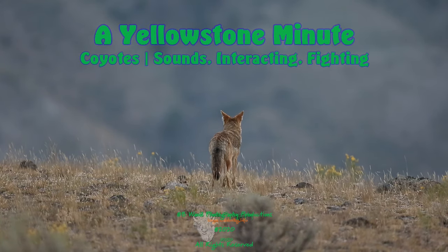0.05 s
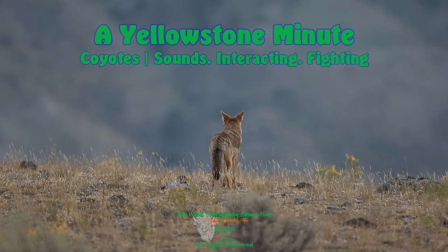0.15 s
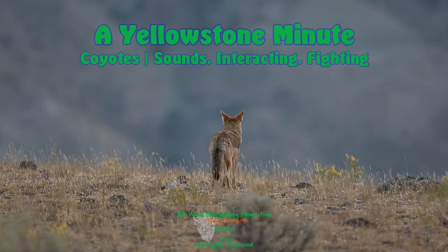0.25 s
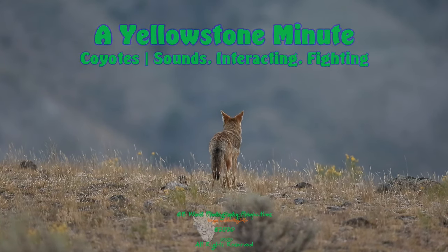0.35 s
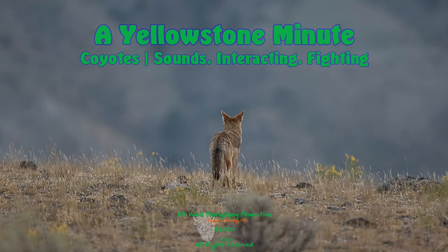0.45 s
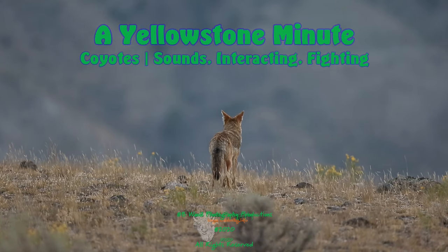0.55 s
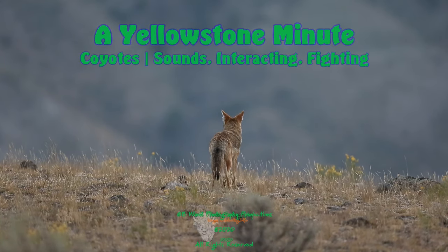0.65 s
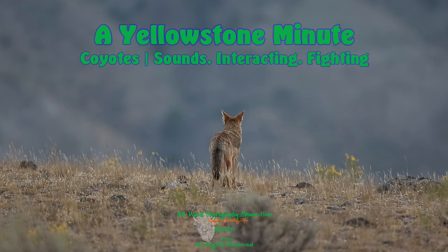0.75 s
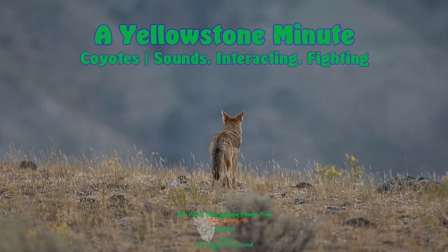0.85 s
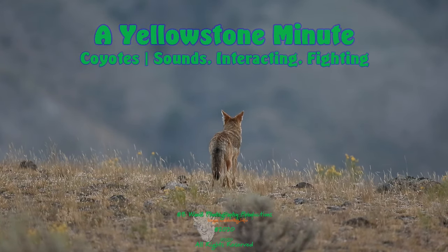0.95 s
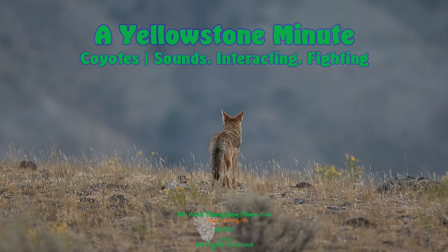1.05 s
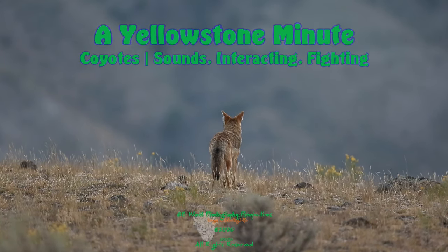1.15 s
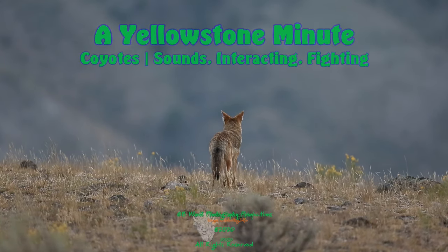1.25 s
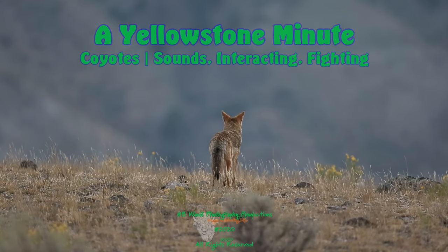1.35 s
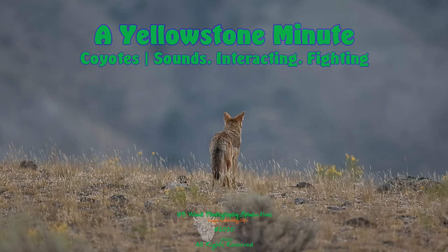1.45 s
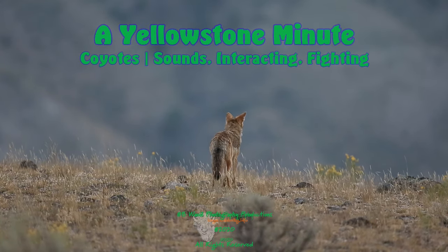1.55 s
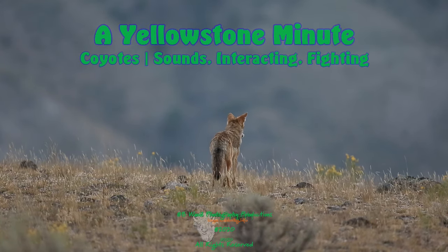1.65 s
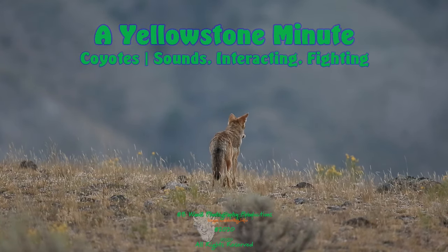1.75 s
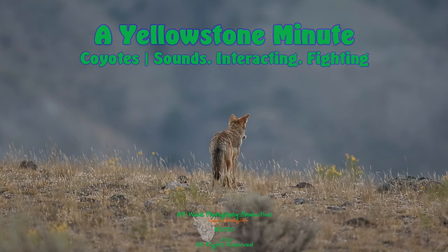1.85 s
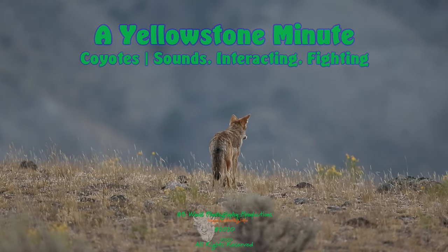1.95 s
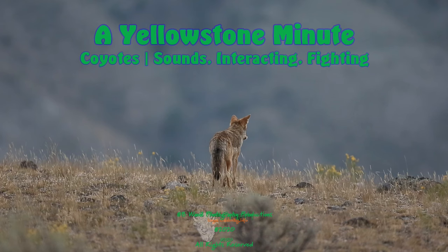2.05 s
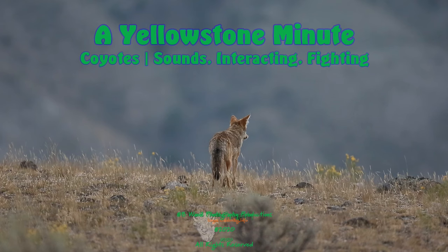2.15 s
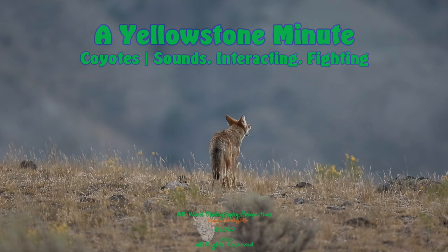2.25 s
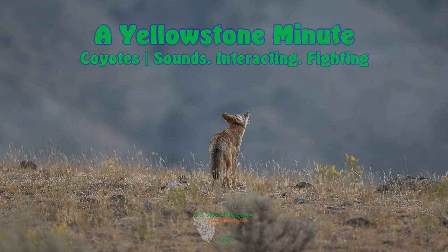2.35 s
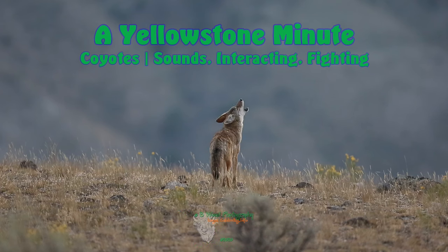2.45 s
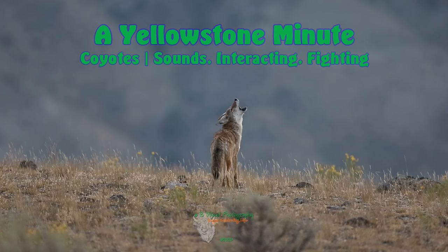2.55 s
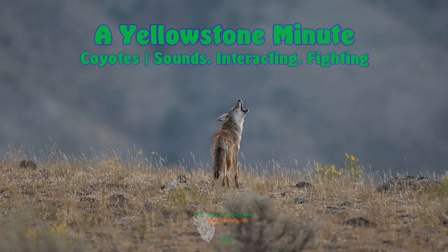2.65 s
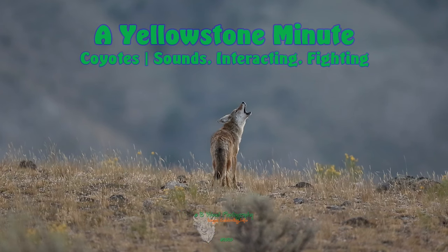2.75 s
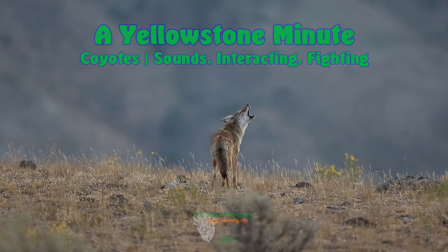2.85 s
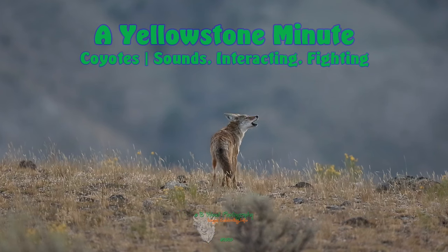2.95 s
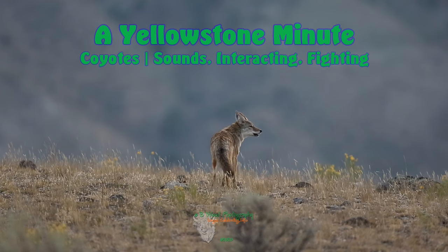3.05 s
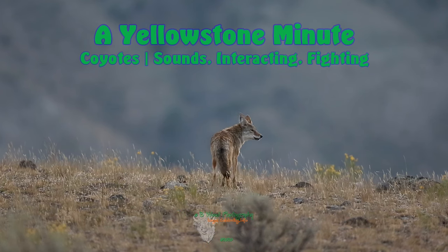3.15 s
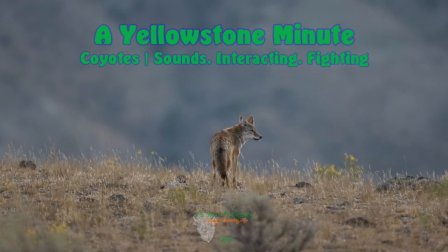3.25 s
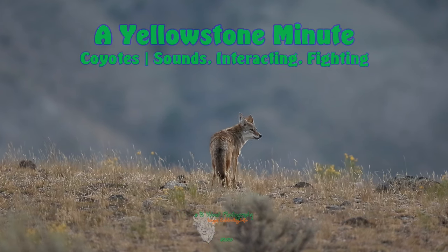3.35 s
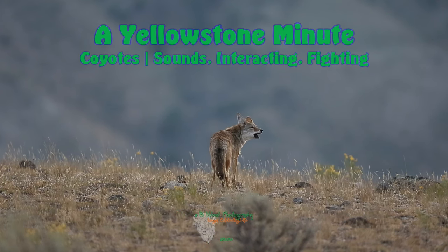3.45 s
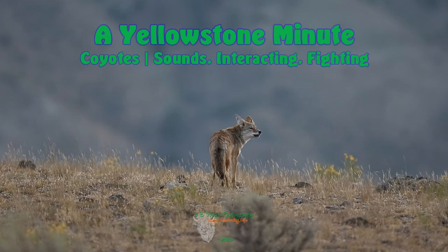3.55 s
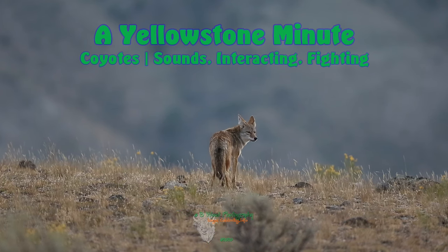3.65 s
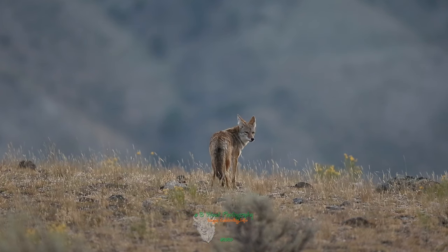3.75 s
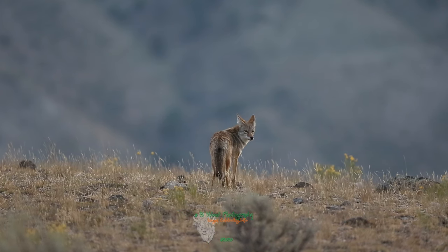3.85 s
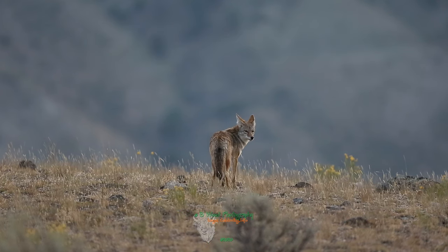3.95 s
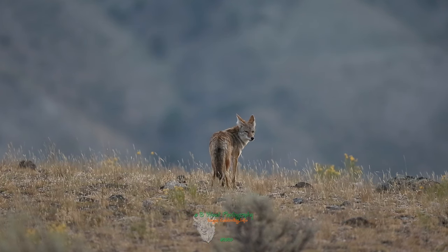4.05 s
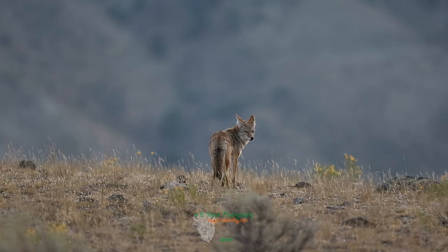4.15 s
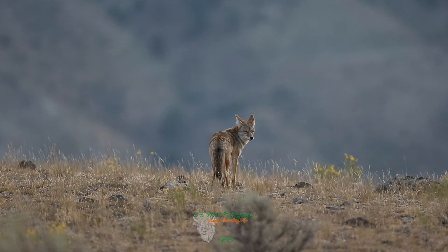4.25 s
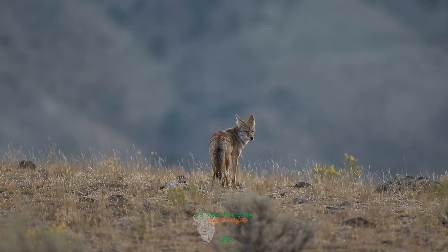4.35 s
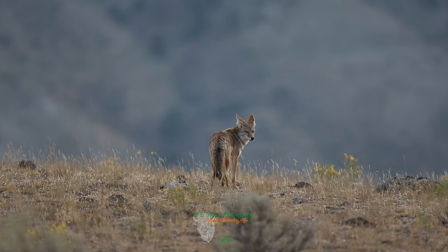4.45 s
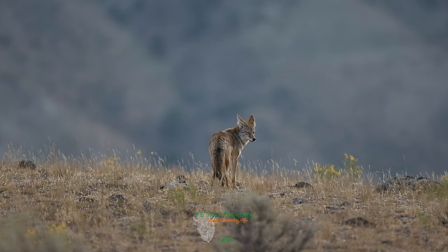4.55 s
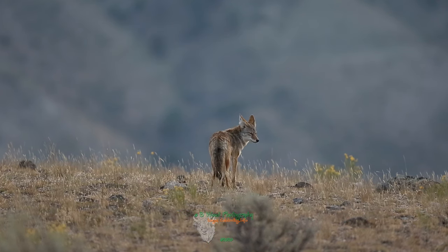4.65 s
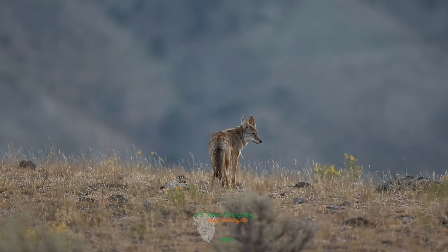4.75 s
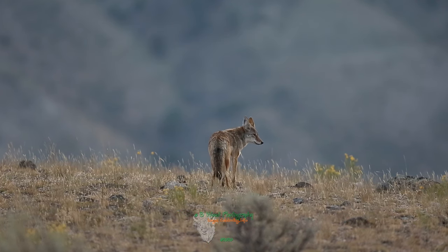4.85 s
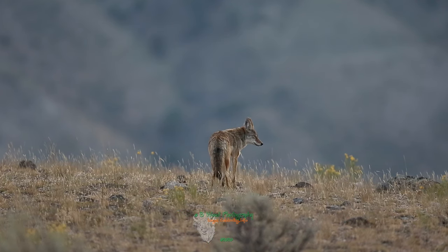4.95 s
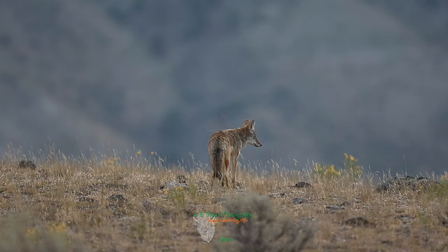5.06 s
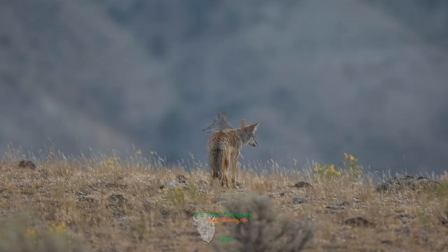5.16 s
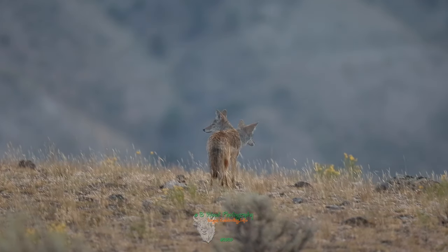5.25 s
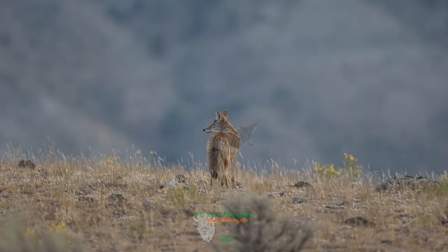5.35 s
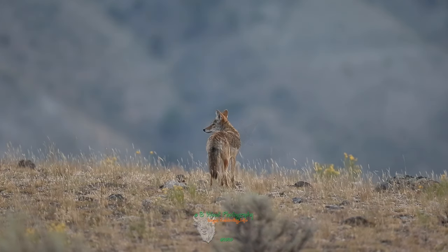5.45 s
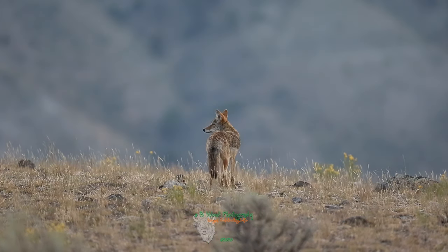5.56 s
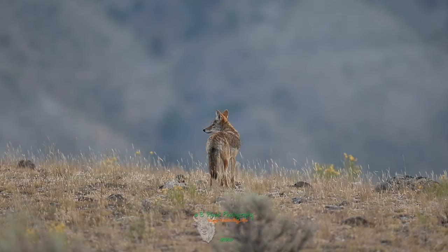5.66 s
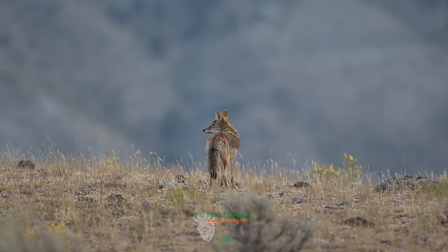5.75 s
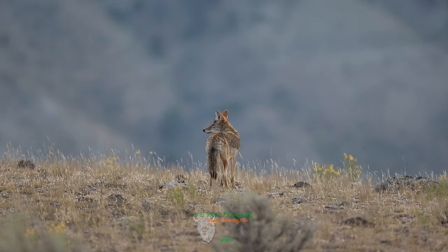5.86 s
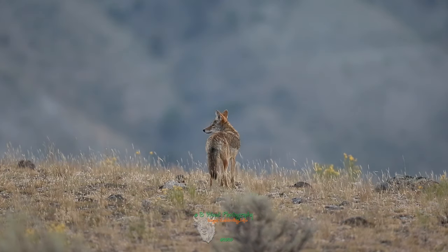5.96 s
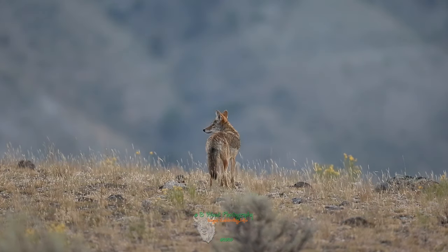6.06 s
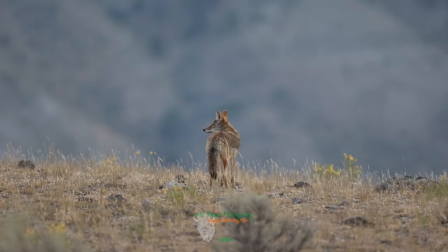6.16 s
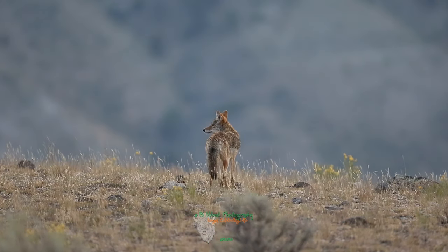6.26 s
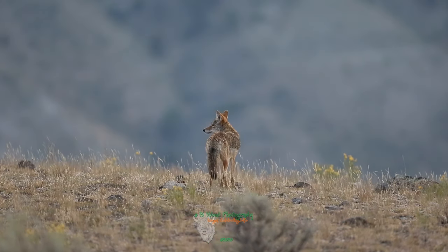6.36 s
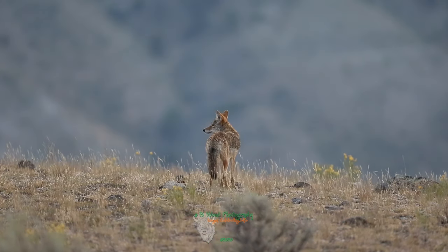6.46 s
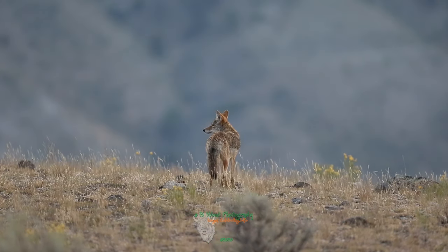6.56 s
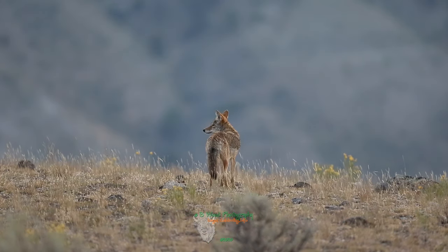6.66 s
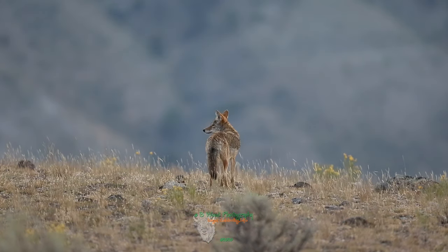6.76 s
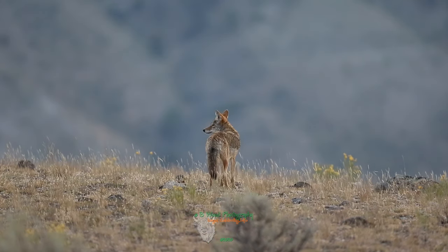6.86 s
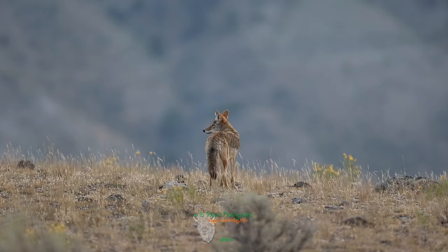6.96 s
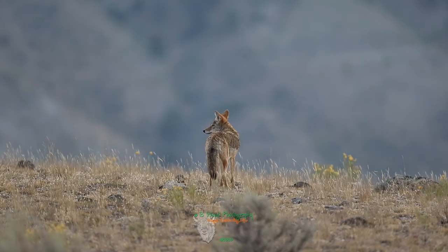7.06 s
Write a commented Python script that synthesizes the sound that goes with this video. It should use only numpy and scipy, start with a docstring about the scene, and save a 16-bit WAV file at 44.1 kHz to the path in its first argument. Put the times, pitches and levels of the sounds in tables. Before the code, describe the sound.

On an open hillside, small rasping magpie calls with upward-sliding squeaks run over a soft wash of air. A coyote gives a rough bark, then another that breaks into a clear half-second howl, followed by a bark and weak huffs. A distant raven croaks low. The sound briefly dips to silence, then returns with louder, brighter magpie calls and soft wing flaps. The pickup is slightly hollow and hissy.

```python
"""On an open hillside a coyote barks, breaks into a high howl, then barks and huffs a few more times.
Magpies chatter with rising, rasping calls, a raven croaks and wings flap, over a wash of air.
Voices are pulse trains and puffing noise filtered by resonances, the howl is a sum of partials,
and wings and air are shaped noise. Two offset tracks sum to a comb, and the level briefly dips to silence."""
import sys
import numpy as np
from scipy import signal
from scipy.fft import rfft, irfft, next_fast_len
from scipy.io import wavfile
from scipy.ndimage import uniform_filter1d

SR = 44100
rng = np.random.default_rng(int(sys.argv[2]) if len(sys.argv) > 2 else 0)


def invert_db(x):
    """Field ratio 10**(x/20) for x, a level in decibels (scalar or array-like)."""
    u = np.asarray(x, float) / 20
    return 10 ** u


def file_out(sig):
    """Save sig as 16-bit WAV at sys.argv[1]."""
    # one column per channel
    cols = np.atleast_2d(sig).T
    # limit, then scale
    lim = np.clip(cols, -1, 1)
    pcm = np.round(lim * 32767).astype(np.int16)
    wavfile.write(sys.argv[1], SR, pcm)


N = 313110  # samples in the scene

# resonance of the coyote's open muzzle: frequency_hz, gain_db
MUZZLE_RESONANCE = [(150, -30), (300, -13.5), (800, -1), (1300, -1), (2000, -2.5), (2800, -5.5),
                    (3600, -21), (5000, -32), (9000, -31), (14000, -74)]


def evened(x):
    """Normalisation: scales a signal to rms 1."""
    return x / np.sqrt(np.mean(x ** 2) + 1e-20)


def colour(x, gain):
    """Linear filtering: multiplies the spectrum by gain(Hz)."""
    size = next_fast_len(len(x) + 512)
    return irfft(rfft(x, size) * gain(np.fft.rfftfreq(size, 1 / SR)), size)[:len(x)]


def shape(points):
    """Frequency response: interpolates (Hz, dB) points along a logarithmic frequency axis."""
    f, db = np.transpose(points)
    return lambda hz: invert_db(np.interp(np.log(hz + 1), np.log(f), db))


def add(mix, s, sound):
    """Superposition: adds a sound to the mix at a time in seconds."""
    at = round(s * SR)
    part = mix[max(at, 0):][:len(sound) + min(at, 0)]
    part += sound[max(-at, 0):][:len(part)]


def wander(n, span):
    """Random modulation: noise smoothed twice over span samples, at rms 1."""
    smooth = uniform_filter1d(rng.standard_normal(n), span)
    return evened(uniform_filter1d(smooth, span))


def voice(hz, rough, jitter, count, pure=0, lead=0):
    """Source of a voice: unsteady pulses blended with noise that puffs once a cycle."""
    rough = np.clip(rough, 0, 1)
    turns = np.cumsum(hz * (1 + jitter * rough * wander(len(hz), span=30))) / SR
    slope = pure * (1 - rough) ** 2  # thins the overtones of clear notes
    sizes = []
    for k in range(1, count):
        partial_db = 2.5 * wander(len(hz), span=400) + 5 * (k == lead)  # partial number lead stands out
        sizes.append(invert_db(partial_db) / k ** slope)
    pulses = sum(size * np.cos(2 * np.pi * k * turns + np.pi / 8 * k ** 2)
                 for k, size in enumerate(sizes, start=1))
    pulses /= np.sqrt(sum(.5 * size ** 2 for size in sizes))
    puffs = (0.46 + np.exp(-(turns % 1) / 0.52)) * rng.standard_normal(len(hz))
    return np.sqrt(1 - rough) * pulses + np.sqrt(rough) * evened(puffs)


def air():
    """Broadband noise: the steady wash of the valley, a thin whine and a few soft wind gusts."""
    # spectrum of the wash: frequency_hz, relative_density_db
    wash_spectrum = [(15, -49.5), (25, -27.5), (80, -10), (151, -11), (241, -4.5), (357, -3), (504, -5),
                     (630, -7.5), (730, -2), (1190, -9), (7760, -21), (9000, -42.5), (11700, -49),
                     (19800, -120)]
    # wind on the microphone: centre_s, spread_s, peak_db
    gust_rows = [(.355, 0.024, -55), (.43, 0.025, -63), (6.85, 0.025, -66)]
    wash_db, whine_db, whine_hz = -59.5, -76, 7973
    t = np.arange(N) / SR
    wash = evened(colour(rng.standard_normal(N), shape(wash_spectrum)))
    wash *= invert_db(wash_db + 0.45 * wander(N, span=4000))
    rumble = evened(colour(rng.standard_normal(N), lambda hz: hz / (1 + (hz / 60) ** 4)))
    gusts = sum(invert_db(db) * np.exp(-((t - s) / spread) ** 2) for s, spread, db in gust_rows)
    whine = invert_db(whine_db + 2.5 * wander(N, span=900)) * np.sin(2 * np.pi * whine_hz * t)
    return wash + gusts * rumble + whine


def hillside(x, t60_s=0.91, first_s=0.0062):
    """Diffuse reverberation: convolution with dull, exponentially decaying noise of unit energy."""
    t = np.arange(SR) / SR
    tail = rng.standard_normal(SR) * invert_db(-60 * t / t60_s) * (t > first_s)
    tail = colour(tail, lambda hz: 1 / (1 + (hz / 2500) ** 2))
    return signal.fftconvolve(x, tail / np.linalg.norm(tail))[:N]


def flap(s, db, scale_s):
    """Turbulent noise: a wing beat is a short, grainy puff through the colour of feathers."""
    # frequency_hz, gain_db
    feather_colour = [(100, -24), (500, -12), (1300, -1), (2500, -1), (4000, -11.5), (6000, -10.5),
                      (8000, -6), (11000, -26.5), (15000, -25)]
    t = np.arange(0, 2 * scale_s, 1 / SR)
    grain = invert_db(3.1 * wander(len(t), span=25)) * rng.standard_normal(len(t))
    puff = 2.38 * t / scale_s * np.exp(-2.5 * t / scale_s)
    return s, invert_db(db) * evened(colour(grain, shape(feather_colour))) * puff


def croak(s, length, db, hz, rate):
    """Amplitude modulation: fast throbs chop an arched, hoarse note, with a buzz of air above."""
    # resonance of the raven: frequency_hz, gain_db
    raven_resonance = [(150, -70.5), (300, -25), (550, -20.5), (1100, -4.5), (1650, -6), (2200, -18),
                       (3300, -10), (4500, -17.5), (6000, -18.5), (8000, -16), (10000, -33)]
    t = np.arange(0, length, 1 / SR)
    arch = 1 - .12 * (1 - t / length) ** 3 - .18 * (t / length) ** 6  # rises, then sags at the end
    beats = np.cumsum(rate * (1 + .015 * wander(len(t), span=600))) / SR
    throb = np.sin(np.pi * (beats % 1) ** .6) ** 4
    low = (.45 + throb) * voice(hz * arch, .45, jitter=.15, count=5)

    def buzz_gain(f):
        peak = .35 + 1.3 / (1 + ((f - 4550) / 500) ** 2)
        return peak / (1 + (3400 / (f + 1)) ** 8)  # only above the low partials

    buzz = colour((.08 + throb) * voice(hz * arch, .6, jitter=.2, count=16), buzz_gain)
    note = colour(low + invert_db(6.5) * buzz, shape(raven_resonance))
    return s, invert_db(db) * evened(note) * signal.windows.tukey(len(t), .17)


def magpie(s, length, db, low_hz, treble_db):
    """Source and filter: a rasp clears and swells as its pitch slides up, then turns hoarse at the top."""
    # resonance of the beak: frequency_hz, gain_db
    beak_resonance = [(150, -67.5), (600, -19), (1000, -15.5), (1500, -3.5), (2100, -3), (2700, 3),
                      (3100, -6), (3400, -18.5), (4200, -22.5), (6000, -62)]
    # treble resonances that fade with distance, before the turn of the bird: centre_hz, width_hz, gain_db
    close_resonances = [(480, 94, -10.5), (5450, 1140, 0.5), (7510, 2780, -7), (11400, 3000, -24)]
    t = np.arange(0, length, 1 / SR)
    effort_db = db + 44
    glide_s, glide_at, glide_bend = 0.095, 0.6, 1.4  # duration, middle as a share of the call, steepening
    glide = np.clip((t - glide_at * length) / glide_s + .5, 0, 1)
    # a higher start and more effort lift the end of the slide
    high_hz = 792.5 + 0.31 * (low_hz - 520) + 3.5 * effort_db
    hz = low_hz + (high_hz - low_hz) * (glide ** 2 * (3 - 2 * glide)) ** glide_bend

    # louder calls rasp more and swell more
    rasp, start_db = 0.37 + 0.011 * effort_db, -0.8 - 0.36 * effort_db
    clear = np.exp(-((glide - .58) / .35) ** 4)
    lead = 2 if low_hz < 520 and db < -44.8 else 4  # faint, low voices bring out the second partial
    source = voice(hz, rasp * (2.2 - 1.85 * clear), jitter=.08, count=20, lead=lead)
    swell = invert_db(start_db * (1 - np.exp(-((glide - .7) / 0.59) ** 2)))
    edges = np.clip(np.minimum(t / 0.013, (length - t) / 0.016), 0, 1)

    # the beak opens: its resonances move up during the glide
    shut, wide = (colour(source, lambda f: shape(beak_resonance)(f / gape)) for gape in (.96, 1.04))
    body = evened((1 - glide) * shut + glide * wide)

    # a bird facing the microphone shows lower, wider resonances
    facing = 1 - 0.0095 * (treble_db + 11.5)

    def treble_gain(f):
        return sum(invert_db(gain_db) / (1 + abs(2 * (f - facing * centre) * facing ** 4 / width) ** 4)
                   for centre, width, gain_db in close_resonances)

    crackle = invert_db(3 * wander(len(t), span=50))
    hoarse = (source + .6 * rng.standard_normal(len(t))) * crackle
    treble = colour(hoarse, treble_gain)
    treble *= swell * invert_db(0.46 * wander(len(t), span=300)) * np.sin(np.pi * (t / length) ** 1.36) ** 0.58
    return s, invert_db(db) * evened(swell * edges) * (body + invert_db(treble_db) * evened(treble))


def bark(rows):
    """Source and filter: rough pulses excite the open muzzle, with a rush of air as the voice breaks up."""
    s, *columns = np.transpose(rows)
    t = np.arange(s[0], s[-1], 1 / SR)
    effort_db, hz, rough = (np.interp(t, s, c) for c in columns)
    pulses = voice(hz, rough, jitter=.15, count=12, pure=3)
    throat = evened(colour(pulses, shape(MUZZLE_RESONANCE)))
    rush = evened(colour(rng.standard_normal(len(t)),
                         lambda f: f / (1 + f / 250) / (1 + (f / 2500) ** 2)))
    return s[0], invert_db(effort_db) * (throat + 1.3 * np.clip(rough, 0, 1) ** 6 * rush)


def huff(s, held_s, db, hz):
    """Brief excitation: a hoarse bark on one nominal pitch with a quick rise, a hold and a quick fall."""
    rise_s, fall_s, edge_db, rough = 0.006, 0.0085, -18, 0.86  # edge_db is relative to the hold
    return bark([(s - rise_s, db + edge_db, hz, rough), (s, db, hz, rough),
                 (s + held_s, db, hz, rough), (s + held_s + fall_s, db + edge_db, hz, rough)])


def howl():
    """Additive synthesis with period doubling: weaker alternate cycles add half-pitch lines to a clean stack."""
    # second_db is the second partial above the first, as the mouth shapes it
    # time_s, pitch_hz, first_db, second_db
    howl_path = [(2.585, 1008, -27, 3), (2.608, 1060, -25.5, -8.5), (2.647, 1089, -30.5, -9.5),
                 (2.659, 1238, -21, -3.5), (2.689, 1284, -17, -4.5), (2.749, 1358, -19, -1.9),
                 (2.807, 1368, -19.5, 2.5), (2.872, 1417, -15, -9), (2.946, 1381, -21, -1.5),
                 (3.023, 1438, -16.5, -10), (3.051, 1435, -22, -2), (3.067, 1387, -26, 4),
                 (3.073, 1310, -29.5, 3.5), (3.08, 1168, -35.5, -16), (3.091, 795, -37, -20),
                 (3.105, 756, -80, -5)]
    # every second cycle weakens; level of the line at 1.5 x pitch: start_s, length_s, level_db
    halved_rows = [(2.58, 0.023, -34), (2.691, 0.066, -30), (3.09, 0.0089, -34)]
    fade_db_per_s, flicker_db = 1103, 3.5
    s, *columns = np.transpose(howl_path)
    t = np.arange(s[0], s[-1], 1 / SR)
    hz, first, mouth_db = (np.interp(t, s, c) for c in columns)
    angle = 2 * np.pi * np.cumsum(hz * (1 + .0007 * wander(len(t), span=300))) / SR

    # the upper partials come and go, and follow the first by 0.6 dB per dB
    upper_base = -53 + 0.6 * (first + 20)
    upper_db = {3: 0.2, 4: -1.5, 5: -4, 6: -14, 7: -17, 8: -21}
    levels_db = {1: first, 2: first + mouth_db}
    for k, db in upper_db.items():
        levels_db[k] = upper_base + db + flicker_db * wander(len(t), span=1500)

    halves = []
    for at, length, db in halved_rows:
        outside_s = np.maximum(np.maximum(at - t, t - at - length), 0)
        halves.append(db - fade_db_per_s * outside_s)
    half = np.max(halves, axis=0)
    loud_half = half + first  # the higher half-pitch lines show only at full voice
    levels_db |= {.5: half - 25, 1.5: half, 2.5: loud_half + 1.6, 3.5: loud_half - 12,
                  4.5: loud_half - 12, 5.5: loud_half - 2, 6.5: loud_half - 9}

    stack = sum(-invert_db(db) * np.cos(k * angle + 0.23 * k ** 2) for k, db in levels_db.items())
    breath = evened(colour(rng.standard_normal(len(t)), shape(MUZZLE_RESONANCE)))
    breath *= invert_db(first - 37.5)
    return s[0], (np.sqrt(2) * stack + breath) * signal.windows.tukey(len(t), .03)


def scene():
    """Superposition: all the animals, their faint echoes and the air."""
    # scale_s sets the puff; level_db precedes its envelope
    # start_s, level_db, scale_s
    flap_rows = [(3.283, -30.5, 0.005), (5.64, -31, 0.027), (5.972, -23.5, 0.019), (6.128, -25.5, 0.049),
                 (6.302, -32.5, 0.015), (6.321, -32, 0.012), (6.348, -38, 0.015), (6.376, -32.5, 0.023),
                 (6.399, -35.5, 0.018), (6.421, -30.5, 0.022), (6.462, -36.5, 0.0081),
                 (6.484, -33.5, 0.031), (6.514, -34, 0.065), (6.606, -33.5, 0.022), (6.631, -29, 0.01),
                 (6.656, -35, 0.021)]
    # start_s, length_s, level_db, nominal_top_pitch_hz, mean_throbs_per_s
    croak_rows = [(2.378, 0.15, -38.5, 545.5, 116), (2.95, 0.22, -43.5, 572, 44),
                  (4.112, .22, -43.5, 583, 80), (5.148, 0.09, -46.5, 548, 50),
                  (5.45, .205, -41.5, 581.4, 77)]
    # treble_db is relative to the body: high when the bird is near and faces this way
    # start_s, length_s, level_db, start_pitch_hz, treble_db
    magpie_rows = [(-0.06, 0.12, -43, 549, -10.5), (0.07, 0.12, -42.5, 535, -10),
                   (0.161, 0.098, -44.5, 445, -10.5), (0.326, 0.11, -42, 583.5, -9.5),
                   (0.389, 0.097, -45, 457, -11), (1, 0.11, -45.5, 564, -9.5),
                   (1.141, 0.12, -44, 594, -8.5), (1.308, 0.097, -44, 530, -10),
                   (1.453, 0.15, -49, 484, -12.5), (1.625, 0.13, -42, 455, -9),
                   (1.788, 0.11, -41.5, 557, -7.5), (1.872, 0.13, -48, 480, -12.5),
                   (2.072, 0.13, -48.5, 434, -16), (2.603, 0.098, -39.5, 552, -10.5),
                   (2.788, 0.12, -41.5, 562, -12), (3.014, 0.13, -46, 600, -6.5),
                   (3.214, 0.16, -47, 556, -12), (3.438, 0.14, -48, 442.6, -13),
                   (3.653, 0.12, -45.5, 549, -14.5), (3.859, 0.15, -45, 574, -18),
                   (4.086, 0.14, -44.5, 571, -23), (4.298, 0.16, -44, 508, -16),
                   (4.487, 0.16, -45, 507.3, -14), (4.661, 0.15, -45, 486.5, -12),
                   (4.824, 0.16, -42, 579, -13.5), (5.006, 0.11, -46, 508, -28),
                   (5.042, 0.12, -44, 454, -12.5), (5.24, 0.049, -39, 592, -11.5),
                   (5.268, 0.17, -43, 467, -8), (5.363, 0.14, -42, 459, -11), (5.499, 0.14, -44, 561, -2.5),
                   (5.645, 0.15, -39.5, 474, -10.5), (5.846, 0.13, -33, 483.7, 0),
                   (6.006, 0.13, -32, 455.5, 2), (6.177, 0.12, -32.5, 450.7, 0.8),
                   (6.35, 0.099, -45, 480, -9.5), (6.487, 0.12, -45, 512, -8)]
    # one table a bark: time_s, effort_db, pitch_hz, roughness (0-1)
    bark_tables = [
        [(2.33, -56, 456.7, 0.4), (2.36, -36, 522.7, 0.34), (2.385, -25.5, 673, 0.38), (2.41, -29.5, 937, 0.7),
         (2.43, -29.5, 773, 0.2), (2.455, -48, 680, 0.5)],
        [(2.522, -36.5, 674, 0.5), (2.533, -33.5, 710, 0.2), (2.553, -27, 782, 0.37), (2.565, -23, 748, 0.63),
         (2.595, -24, 1006, 0.55), (2.61, -38, 1016, 0.7), (2.65, -44.5, 1077, 0.7)],
        [(3.575, -56, 296, 0.27), (3.61, -34, 440.4, 0.76), (3.635, -23, 628, 0.64), (3.652, -25.5, 795, 0.75),
         (3.667, -31, 841, 0.22), (3.68, -72, 794, 0.1)],
    ]
    # hold_start_s, held_s, effort_db, pitch_hz
    huff_rows = [(3.908, 0.0021, -36, 729), (4.409, 0.019, -36.5, 371.4), (4.856, 0.015, -33.5, 289),
                 (4.899, 0.0026, -40.5, 508)]
    calls = np.zeros(N)
    for source, table in ((flap, flap_rows), (croak, croak_rows), (magpie, magpie_rows), (huff, huff_rows)):
        for row in table:
            add(calls, *source(*row))
    for rows in bark_tables:
        add(calls, *bark(rows))
    add(calls, *howl())
    return (calls + invert_db(-31) * hillside(calls) + air())[None]


def low_pass(x):
    """Removes everything above the highest recorded frequency."""
    return signal.sosfilt(signal.butter(12, 16440, fs=SR, output="sos"), x)


def record(dry):
    """Distortion and interference: a lopsided preamp, two offset tracks in a comb, hiss, dip and band limit."""
    track_lag, track_share = 166.45, 0.61  # delay in samples, gain of the later track
    dip_s, dip_ramp_s = 5.237, .24  # centre of the dip, duration of each slope
    edge_hz, low_hz, hiss_db = 15450, 14, -61
    bent = dry[0] - 0.11 * dry[0] ** 2
    comb = colour(bent, lambda hz: 1 + track_share * np.exp(-2j * np.pi * hz * track_lag / SR))
    comb /= np.hypot(1, track_share)
    hiss = invert_db(hiss_db) * rng.standard_normal(N)
    dip = np.clip(abs(np.arange(N) / SR - dip_s) / dip_ramp_s, 0, 1)

    def band_limit(hz):
        return 1 / (1 + (hz / edge_hz) ** 120) * hz ** 2 / (hz ** 2 + low_hz ** 2)

    finished = colour((comb + hiss) * dip, band_limit)
    return low_pass(finished[None])


dry = scene()
out = record(dry)
file_out(out)
```